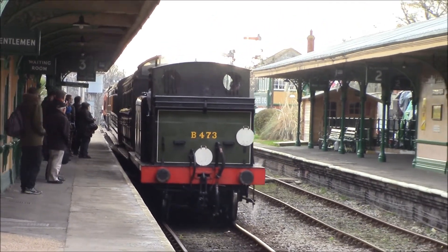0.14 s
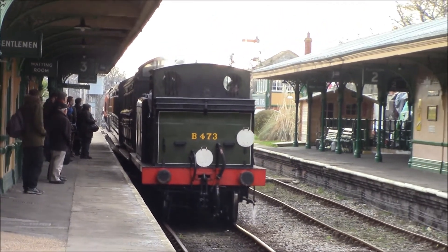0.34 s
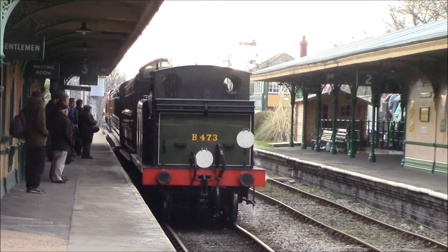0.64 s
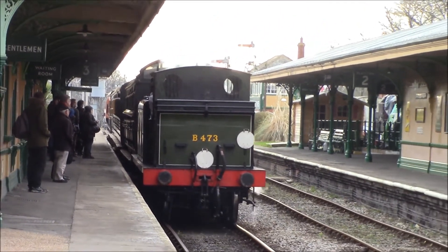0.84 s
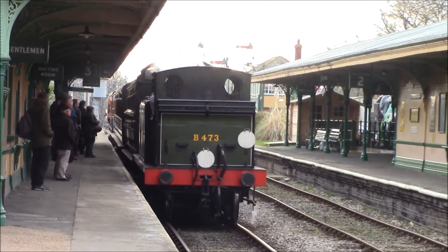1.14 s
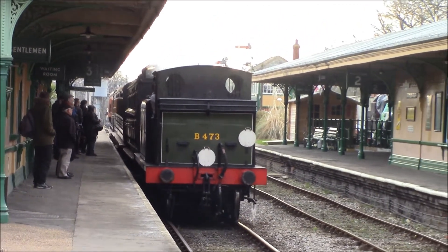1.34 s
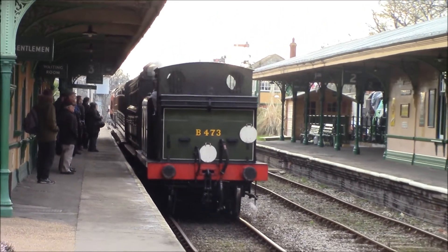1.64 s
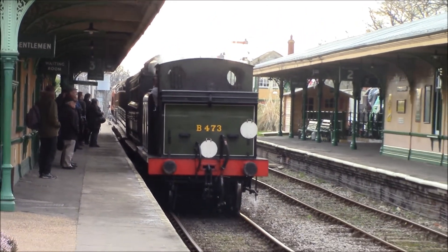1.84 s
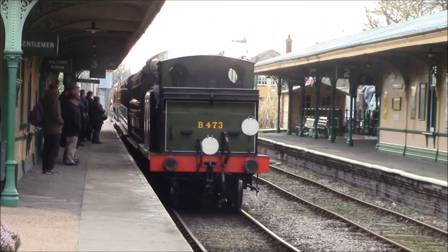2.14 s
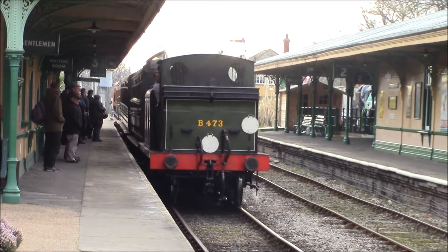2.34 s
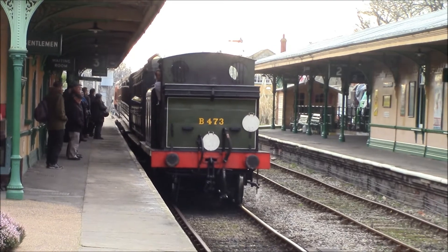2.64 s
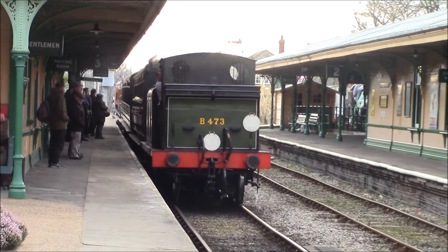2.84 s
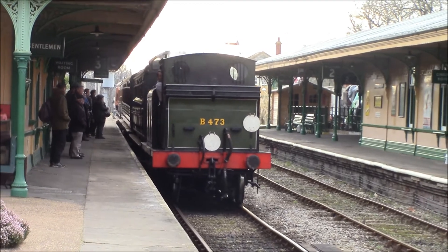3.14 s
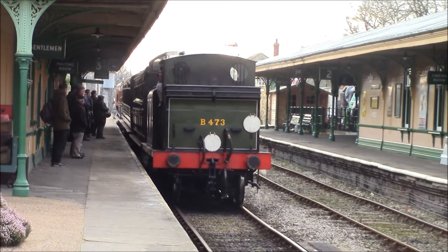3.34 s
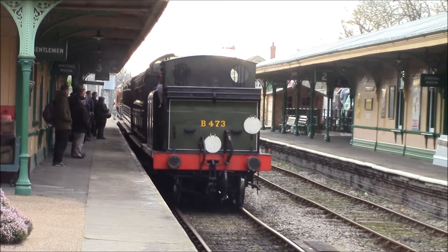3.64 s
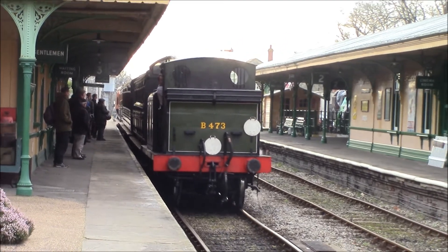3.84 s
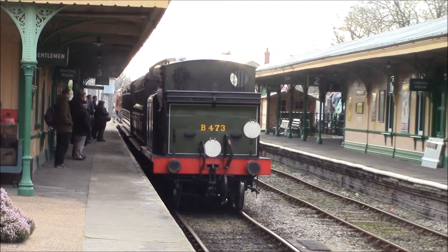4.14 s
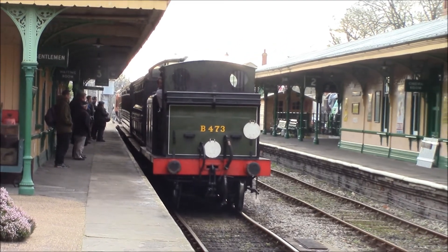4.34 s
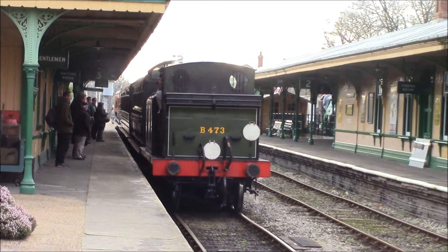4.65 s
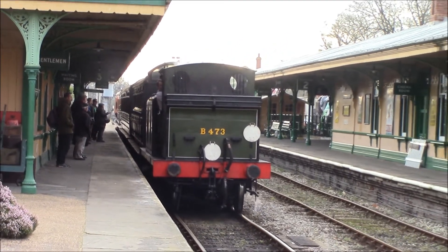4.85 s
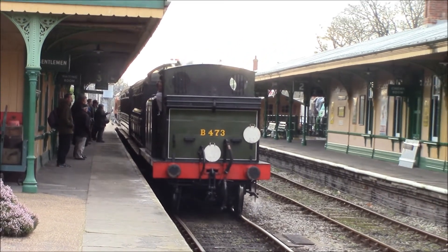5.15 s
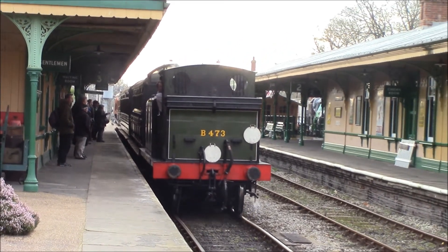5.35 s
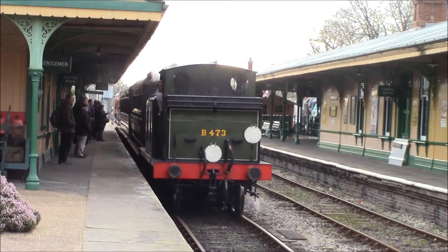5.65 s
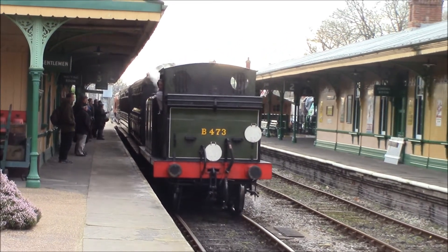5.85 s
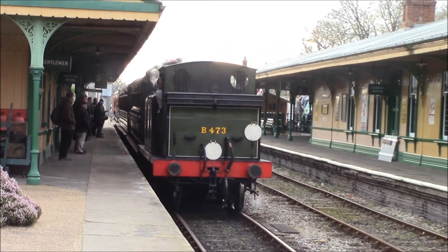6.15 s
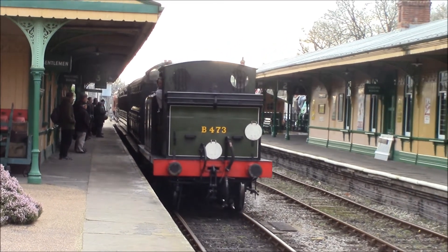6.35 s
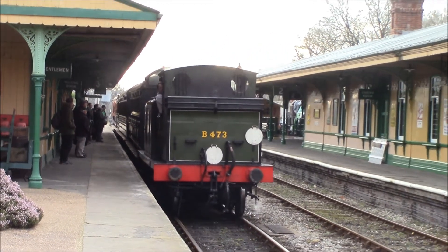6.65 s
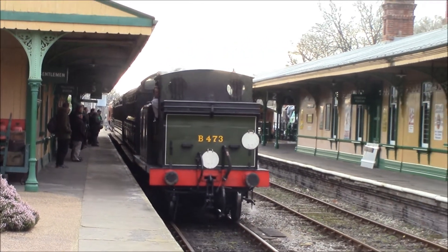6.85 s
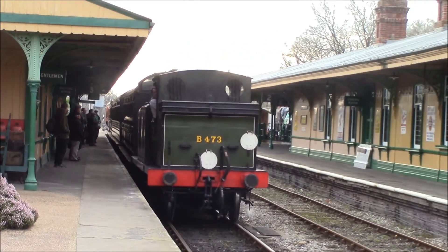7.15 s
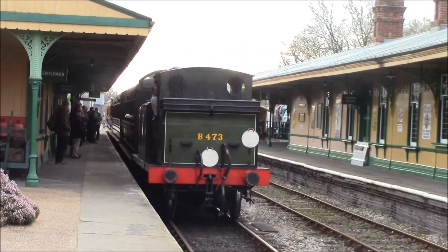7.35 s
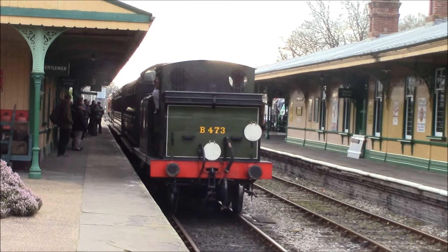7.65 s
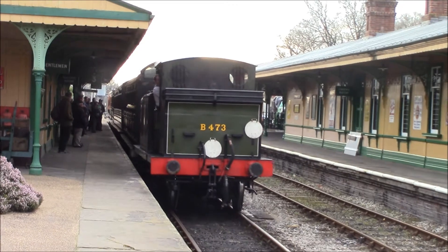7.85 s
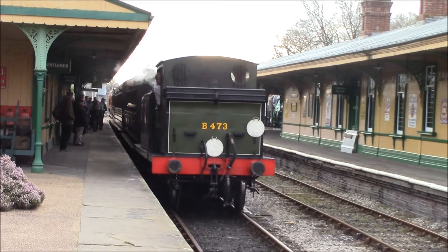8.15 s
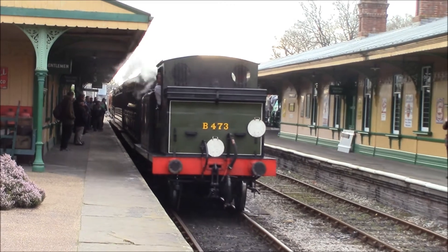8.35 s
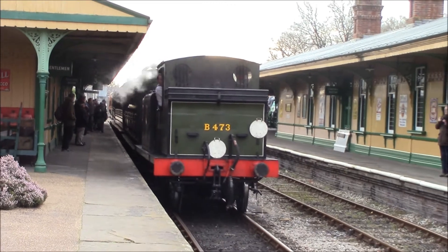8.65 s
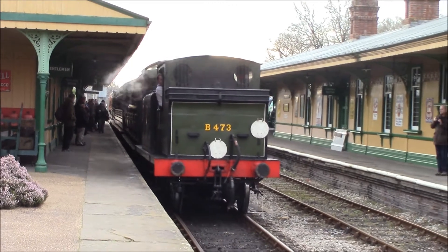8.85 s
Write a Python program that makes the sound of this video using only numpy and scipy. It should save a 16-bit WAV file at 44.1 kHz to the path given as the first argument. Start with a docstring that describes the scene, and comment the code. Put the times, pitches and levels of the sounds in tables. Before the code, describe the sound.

From the start, a loud hollow roar of steam rings through a pipe over bright hiss, swelling to about 0.3 s, then shutting off sharply; a breathy remnant and low drone die away by 0.85 s. A dull wind knock lands near 0.6 s. From 1 to 4 s a quieter, thin, steady hiss sizzles and sputters, with short bright spurts whose pitch often rises, a brief breathy whistle near 2.2 s and a firm low thump at 2.05 s. From 4.4 s the steam builds, peaking around 5.1 s and staying strong and rushing until 6.8 s, with wet spits. Faint wheel rumble rises near 6.75 s. Dull wind puffs crowd the microphone from 6.8 to 7.5 s as the hiss drops. Until 9 s it surges unevenly, with bright spurts, faint whistling and small knocks near 8.75 s. Open-air platform, close stereo perspective, slight dull reflections.

```python
"""Escaping steam hisses, spurts and swells as a tank engine rolls slowly in, heard from the platform edge:
coloured noise follows a jet curve, with narrow noise bands for the singing gap and pipe.
A hollow roar of steam through a ringing pipe shuts off early and dies away over a low drone.
Wheels rumble faintly as low noise; puffs of air knock dully on the microphone as short bursts of low
noise, thickest from about 6.8 to 7.5 s, and a few crosswind thumps differ a little on each side."""
import sys
import numpy as np
from scipy import signal
from scipy.fft import rfft, irfft, next_fast_len
from scipy.io import wavfile
from scipy.ndimage import uniform_filter1d

SR = 44100
rng = np.random.default_rng(int(sys.argv[2]) if len(sys.argv) > 2 else 0)


def int16_out(signal):
    """Quantize to a 16-bit WAV file."""
    q = np.round(np.clip(np.atleast_2d(signal).T, -1, 1) * 32767)
    wavfile.write(sys.argv[1], SR, q.astype(np.int16))


N = 397341

# Main jet, drives the hiss, sizzle and spray: (time [s], level [dB])
JET_DB = [(0, -25), (.13, -22.5), (.3, -21.5), (.365, -24), (.39, -28.5), (.95, -28.5), (1.15, -30),
          (1.7, -27.5), (2.05, -27), (2.09, -30.5), (2.14, -28), (2.5, -28), (2.57, -29), (2.8, -27.5),
          (3.68, -27), (3.76, -25), (3.85, -28.5), (3.99, -29), (4.06, -26), (4.32, -27), (4.43, -24),
          (4.77, -25), (4.93, -22), (5.04, -20.5), (5.12, -18.5), (5.27, -21), (5.4, -19.5), (5.54, -21.2),
          (5.85, -20), (6.08, -20), (6.25, -18), (6.32, -20), (6.49, -19), (6.68, -20.5), (6.81, -21.5),
          (6.88, -25), (7.2, -26), (7.3, -28.5), (7.44, -24.5), (7.64, -28), (7.74, -25.5), (7.83, -26),
          (7.91, -22.5), (8.18, -27), (8.34, -24.5), (8.66, -25.5), (8.83, -23.5), (9, -25.5)]
# Deep rush of the jet: (time [s], level [dB])
RUSH_DB = [(0, -38), (.5, -36), (1.1, -38), (4.85, -38), (4.97, -34), (6.2, -32), (6.75, -31.5), (7.1, -39),
           (7.7, -38), (9, -35)]
# Steam spectra: (frequency [Hz], relative level [dB])
RUSH_COLOUR = [(250, -22), (480, -17), (650, -9), (1000, -1.5), (1300, -.5), (1600, 1.5), (2100, -32),
               (3500, -42)]
HISS_COLOUR = [(900, -32), (1500, -9), (1800, -6), (2400, -2), (3050, 0), (3950, -2.1), (4250, -5),
               (4900, -7.5), (5600, -7.5), (6500, -9.5), (7500, -8.5), (12000, -29.5)]
SIZZLE_COLOUR = [(4000, -31), (5200, 4), (6500, -1.5), (7200, -1), (7700, 6.5), (8800, -1), (9500, 0),
                 (11000, -36), (15000, -42)]
SPRAY_COLOUR = [(7000, -26), (9800, 7), (11000, 3), (12300, 2.5), (12700, -5), (13300, -2), (14300, -8),
                (15600, -14)]
# Resonances rung by the steam: (frequency [Hz], width [Hz], lift [dB])
STEAM_MODES = [(574, 117, 8.5), (813, 55, 7), (1220, 200, 6), (1827, 94, 7), (2000, 220, 4), (2230, 99, 3),
               (2550, 104, 4.5), (2840, 170, 3), (3093, 99, 4), (3256, 82, 2), (3544, 95, 3),
               (3870, 176, 4), (4040, 70, 2), (4620, 90, 2), (5490, 300, 0.5), (7480, 430, -4),
               (8720, 480, 5.5)]
# Jet at rest, and layer levels there
REST_DB, SIZZLE_DB, SPRAY_DB = -26.5, -37.5, -46
# Layer gain per dB of jet
SIZZLE_FOLLOW_DB_PER_DB, SPRAY_FOLLOW_DB_PER_DB = 0.54, 0.79
# Spray grows steadily as the engine nears, pivoting about this time
SPRAY_DB_PER_S, SPRAY_PIVOT_S = 0.6, 2.4
# Bright spurts and some dull lapses from a narrow gap; pitch may climb, hold or sink:
# (start [s], length [s], sizzle lift [dB], spray lift [dB], pitch rise [Hz])
SPURTS = [(0, 0.24, 2.5, 0, 0), (1.08, 0.2, 2.5, 4.5, 0), (1.824, 0.24, 2.5, 1, 299),
          (2.118, 0.17, 7, 4, 650), (2.344, 0.17, 4.5, 2, 600), (2.57, .24, 2.5, 2, 0),
          (3.134, .13, 4, 4, 99), (3.44, 0.23, 1, 0, 0), (3.69, 0.1, 2.5, 1, 1), (3.871, 0.053, 5, 4, 1),
          (4.119, 0.35, -7, -0.5, 0), (4.478, 0.19, 5, 2.5, 800), (4.731, 0.26, 6.5, 0, 751),
          (5.093, .08, -8, 1, 300), (5.17, 0.19, -10, 0.5, 300.5), (5.43, 0.41, 4.5, 1.5, 150),
          (5.95, 0.12, 8.5, 4, 249.5), (6.22, 0.098, 9.5, 3, 301), (6.372, 0.09, 10, 8, 350),
          (6.563, 0.088, 4, 2, 253.5), (6.752, 0.08, 6, 1, 148.5), (6.897, 0.12, 5, 2.5, -2.5),
          (7.162, 0.094, 5, 0, -200), (7.877, 0.11, 5.5, 1, 450), (7.984, 0.052, 9, 4, 450),
          (8.58, 0.11, 3, 0, 149), (8.911, 0.092, 10.5, 4, 98)]
SPURT_EDGE_S, SPURT_GLIDE_S = 0.0553, 0.12  # opening or closing time; pitch glide time
SPURT_HISS_SHARE = 0.014  # share of the spray lift [dB] added to the hiss
# Gap pitch at rest; water in the gap makes it jump about
GAP_HZ, GAP_WAVER_HZ, GAP_WAVER_PER_S = 7506, 140.2, 45
# Lower tone of the same gap: (time [s], level [dB])
RING_DB = [(0, -46), (1.5, -50), (2.1, -45.5), (4, -47), (5.9, -44), (6.4, -39), (6.9, -40), (7.7, -48),
           (8, -39.5), (8.4, -47), (9, -44)]
RING_HZ, RING_HALF_WIDTH_HZ = 5490, 66
RING_LIFT_SHARE, RING_RISE_SHARE = 0.3, 0.55  # shares of sizzle lift [dB] and pitch rise [Hz]
# Half-whistling pipe: (time [s], level re jet [dB])
WHISTLE_DB = [(0, -21), (2, -22), (4.6, -18), (5.2, -9), (6.1, -13), (6.4, -13), (6.9, -15), (9, -6)]
# Its tones: (frequency [Hz], half-width [Hz], relative level [dB])
WHISTLE_MODES = [(1812, 20, -4), (2528, 20, 0), (3020, 50, -1), (3545, 35, -7), (3940, 70, -3)]
# Its clearest tone: (time [s], level re jet [dB])
LEAD_TONE_DB = [(1.9, -28), (2.17, -7), (2.4, -28), (4.2, -22), (4.5, -5), (4.85, -18), (5.35, -11),
                (5.8, -14), (6.3, -17), (7.2, -16), (7.45, -15), (7.75, -11.5), (7.93, -18), (8.08, -9),
                (8.38, -10), (8.6, -14), (8.85, -11), (9, -19)]
LEAD_HZ, LEAD_HALF_WIDTH_HZ = 2872, 26
# Wet spits, bell-shaped: (centre time [s], level [dB], standard deviation [s])
SPITS = [(.22, -31, .02), (.32, -29, .022), (3.57, -35, .02), (3.754, -38, 0.028), (4.49, -39, 0.027),
         (5.107, -26, 0.039), (6.253, -24, 0.035), (6.422, -39, .03), (6.79, -26.5, 0.054),
         (7.453, -28, .024), (7.95, -34, 0.05), (8.28, -35, .022), (8.43, -34, .025)]
# Spit spectrum: (frequency [Hz], relative level [dB])
SPIT_COLOUR = [(2000, -6), (3900, 9), (4600, -7), (5500, 7.5), (6500, -6), (8000, -5), (11000, -16),
               (15000, -20)]
# Default stereo width: (frequency [Hz], side minus mid [dB])
WIDTH = [(40, -24), (150, -49), (500, -48), (1200, -64), (2300, -59), (3000, -58), (3800, -15.5),
         (8000, -13.5), (13000, -10.5)]

# Spectra of the roar, of the steam lingering after it and of its drone:
# (frequency [Hz], relative level [dB])
ROAR_COLOUR = [(200, -18), (430, -8), (600, -2), (930, -3.5), (1300, -1), (1550, -2.5), (1900, -9),
               (2400, -14.5), (3500, -14), (5500, -57)]
LINGER_COLOUR = [(200, -11), (450, -6), (800, -2.5), (1150, -8), (1550, 0.5), (2100, -2), (3500, 1),
                 (5500, -50)]
DRONE_COLOUR = [(25, -28), (50, -19), (70, -8), (110, 4), (170, -2.5), (230, 0.5), (280, 3), (400, -6),
                (800, -60)]
# Pipe resonances, and those rung only by the full blast: (frequency [Hz], width [Hz], lift [dB])
PIPE_MODES = [(157, 5, 14), (176, 5, 11), (218, 18, 9), (267, 8, 10), (590, 12, 6), (629, 14, 6),
              (797, 14, 10), (1391, 20, 11), (1445, 20, 7), (1492, 15, 9)]
BLAST_MODES = [(1085, 25, 8), (1151, 12, 17), (1185, 26, 10), (2650, 200, 13), (3230, 300, 15),
               (3750, 300, 12)]
# Near-steady pipe tones: (frequency [Hz], level re strongest [dB])
DRONE_TONES = [(157, 0), (175, -1), (268, -6)]
# Roar fills the station: (frequency [Hz], side minus mid [dB])
ROAR_WIDTH = [(60, -16), (110, -33), (200, -36), (380, -20), (700, -32), (1290, -26), (2380, -13),
              (4400, -16), (8120, -20), (15000, -17)]
ROAR_PEAK_S, ROAR_SHUT_S, ROAR_SHUTTING_S, ROAR_END_S = 0.2, 0.31, 0.065, 0.82
ROAR_RELEASE_DB_PER_S = 104  # after ROAR_END_S

# Rolling wheels: (time [s], level [dB])
ROLL_DB = [(1, -51), (1.5, -54), (2.6, -51), (3.9, -56.5), (4.75, -61.5), (5.05, -51.5), (5.8, -49),
           (6.75, -39.5), (7.25, -51), (8.5, -57), (9, -50)]
# Rolling spectrum: (frequency [Hz], relative level [dB])
ROLL_COLOUR = [(20, -42), (35, -29), (50, -22), (80, -15.5), (150, -3), (230, -1.5), (310, 4.5), (420, -5),
               (700, -1.5), (1500, -26)]

# Single hard puffs on the microphone:
# (time [s], level before BUFFET_GAIN_DB [dB], length [s], centre [Hz])
BUFFETS = [(0.583, -21, 0.006, 206), (2.029, -27, 0.013, 312), (2.043, -18, 0.0065, 360),
           (2.068, -31, .003, 420), (2.469, -25.5, .0045, 302), (2.692, -36, 0.0065, 265),
           (2.734, -41, .008, 270), (2.85, -32, 0.012, 320), (3.153, -40, .006, 320),
           (3.395, -41, 0.012, 288), (4.083, -42, .008, 350), (6.137, -37, 0.013, 246),
           (6.388, -32, 0.01, 322.5), (6.559, -24, 0.0056, 271.2), (6.732, -23.5, 0.0054, 281),
           (6.785, -12.8, 0.008, 330), (6.804, -13, 0.0041, 340), (6.811, -13.5, 0.007, 280),
           (6.847, -22, 0.0036, 430), (6.855, -19, 0.006, 430), (6.864, -17, .006, 405),
           (6.895, -23, 0.011, 477), (6.911, -24.5, 0.0079, 424), (6.976, -33, .005, 480),
           (6.993, -19.5, 0.0036, 660), (7.011, -16.5, 0.0042, 477), (7.023, -22.5, 0.0053, 623),
           (7.033, -22, 0.006, 900), (7.118, -27, 0.0076, 381), (7.163, -36, .005, 270),
           (7.34, -29.5, 0.0062, 330), (7.367, -23, 0.0025, 598), (7.38, -25, .004, 520),
           (7.392, -16, .005, 540), (7.398, -20, .004, 520), (7.405, -18.5, 0.0042, 484),
           (7.431, -24, .006, 480), (7.445, -18.5, .004, 560), (7.455, -18.5, 0.006, 582),
           (7.468, -21, 0.0042, 484), (7.501, -31, 0.0056, 400), (7.52, -28, 0.007, 480),
           (7.658, -28, 0.0068, 313.4), (7.932, -37, 0.042, 291), (8.285, -32, 0.0064, 463),
           (8.523, -35, .0095, 286.7), (8.739, -25, 0.0078, 371), (8.757, -28, 0.0074, 330),
           (8.792, -26, 0.0044, 440), (8.809, -25.5, 0.0039, 420), (8.878, -33, 0.013, 345)]
# Gusts of weaker eddies:
# (start [s], length [s], eddy level before scatter, taper and BUFFET_GAIN_DB [dB], centre [Hz])
GUSTS = [(0.518, 0.058, -30, 278), (2.071, 0.036, -39, 260), (2.426, 0.027, -42, 260),
         (2.721, .06, -51, 265), (6.491, 0.084, -29.5, 240), (6.739, 0.12, -26.5, 279),
         (6.968, 0.075, -26, 474), (7.035, 0.052, -28.5, 350), (7.349, .15, -28, 420),
         (7.639, 0.056, -33.5, 279.5), (8.252, 0.075, -36.5, 302), (8.704, .12, -30, 340.3),
         (8.934, 0.069, -35.5, 350)]
BUFFET_GAIN_DB = 0.5
EDDY_GAP_S, EDDY_S, EDDY_SCATTER_DB, GUST_TAPER_DB = 0.013, 0.0076, 4.5, 9  # gap is the mean
SLAP_SHARE = 0.35  # share of power in the slap at the crest, ahead of the wake
# Wake: level re eddy, decay time, corner as a share of the eddy's centre frequency
WAKE_DB, WAKE_S, WAKE_REACH = -16, 0.017, 0.6164
# Crosswind bursts, bell-shaped: (centre time [s], level [dB], standard deviation [s])
CROSSWIND = [(.15, -34, .025), (.258, -26, 0.024), (.328, -31, .012), (.55, -42, .02), (6.805, -34, 0.014)]
# Crosswind spectrum: (frequency [Hz], relative level [dB])
CROSSWIND_COLOUR = [(50, -13), (110, -4), (180, -5), (300, -9), (450, -11), (900, -44)]
# Crosswind width: (frequency [Hz], side minus mid [dB])
CROSSWIND_WIDTH = [(60, -13), (130, -10), (400, -5)]

TOP_HZ = 15700


def steam():
    """A leaking jet: deep rush, ringing hiss, sizzle at the gap and a spray of droplets, all sputtering."""
    push_db = curve(JET_DB) - REST_DB
    sizzle_lift_db, spray_lift_db, rise_hz = spurting()

    rush = turbulence(RUSH_COLOUR, STEAM_MODES, (700, 1500)) * undb(curve(RUSH_DB))

    hiss = turbulence(HISS_COLOUR, STEAM_MODES, (1700, 4300))
    hiss = hiss * undb(curve(JET_DB) + SPURT_HISS_SHARE * spray_lift_db)
    hiss = hiss * flutter(slow_db=0.39, fast_db=0.5, slow_rate=28, fast_rate=180)

    sizzle_noise = turbulence(SIZZLE_COLOUR, STEAM_MODES, (7000, 9500))
    gap_hz = GAP_HZ + rise_hz + GAP_WAVER_HZ * walk(GAP_WAVER_PER_S)
    sizzle = undb(-2.5) * sizzle_noise + undb(-1.5) * singing_gap(gap_hz, half_width_hz=400)
    sizzle = sizzle * undb(SIZZLE_DB + SIZZLE_FOLLOW_DB_PER_DB * push_db + sizzle_lift_db)
    sizzle = sizzle * flutter(slow_db=0.6, fast_db=1.0, slow_rate=12, fast_rate=43)

    spray = turbulence(SPRAY_COLOUR, [], (10000, 15000))
    nearing_db = SPRAY_DB_PER_S * (np.arange(N) / SR - SPRAY_PIVOT_S)
    spray = spray * undb(SPRAY_DB + SPRAY_FOLLOW_DB_PER_DB * push_db + spray_lift_db + nearing_db)
    spray = spray * undb(walk(12))

    treble = (sizzle + spray) * flutter(slow_db=0.88, fast_db=0.97, slow_rate=36, fast_rate=230)
    jet = (rush + hiss + treble) * flutter(slow_db=0.14, fast_db=0.29, slow_rate=25, fast_rate=62)

    ring = singing_gap(RING_HZ + RING_RISE_SHARE * rise_hz + 35 * walk(20), RING_HALF_WIDTH_HZ)
    ring = ring * undb(curve(RING_DB) + RING_LIFT_SHARE * sizzle_lift_db + 2.0 * walk(16))
    return echoes(jet) + ring + whistle()


def spurting():
    """Spurts and lapses fade in and out, pitch gliding: sizzle lift [dB], spray lift [dB], pitch rise [Hz]."""
    out = np.zeros((3, N))
    for start_s, length_s, sizzle_db, spray_db, rise_hz in SPURTS:
        opens_s = start_s - SPURT_EDGE_S / 2
        gate = ramp(opens_s, SPURT_EDGE_S) - ramp(opens_s + length_s, SPURT_EDGE_S)
        out[0] += sizzle_db * gate
        out[1] += spray_db * gate
        out[2] += rise_hz * gate * ramp(start_s, SPURT_GLIDE_S)
    return out


def singing_gap(centre_hz, half_width_hz):
    """A gap sings a narrow band: low-passed noise pairs modulate a carrier of gliding pitch; rms 1."""
    lowpass = signal.butter(2, half_width_hz, fs=SR, output="sos")
    slow = signal.sosfilt(lowpass, rng.standard_normal((2, N)))
    phase = 2 * np.pi * np.cumsum(centre_hz) / SR
    band = slow[0] * np.cos(phase) + slow[1] * np.sin(phase)
    return band / band.std()


def whistle(waver_db=3.0, waver_per_s=11):
    """Narrow, breathy tones where the jet rings its pipe; each comes and goes on its own."""
    size = next_fast_len(N)
    hz = np.arange(size // 2 + 1) * SR / size
    tones = 0
    for centre_hz, half_width_hz, db in WHISTLE_MODES:
        resonance = 1 / (1 + ((hz - centre_hz) / half_width_hz) ** 2)
        tone = irfft(rfft(rng.standard_normal(size)) * resonance, size)[:N]
        tones = tones + tone * undb(db + waver_db * walk(waver_per_s))
    tones = tones / tones.std() * undb(curve(WHISTLE_DB))
    lead = singing_gap(LEAD_HZ + 14 * walk(9), LEAD_HALF_WIDTH_HZ) * undb(curve(LEAD_TONE_DB))
    return (tones + lead) * undb(curve(JET_DB))


def echoes(x, count=9, echo_db=-18, spread_s=0.024, drift=0.000225, dull_hz=5000):
    """Platform, canopy and boiler side return faint, dull copies; delays creep as the engine moves."""
    n = np.arange(N)
    dull = signal.sosfilt(signal.butter(1, dull_hz, fs=SR, output="sos"), x)
    out = x.copy()
    for late, creep in rng.uniform(0, 1, (count, 2)):
        delay_samples = (0.1 + late) * spread_s * SR + (2 * creep - 1) * drift * n
        out += undb(echo_db) * np.array([np.interp(n - delay_samples, n, ear, left=0) for ear in dull])
    # hold the power of the sum
    return out / np.sqrt(1 + count * undb(echo_db) ** 2)


def spits():
    """Water carried into the jet makes it spit brightly for a moment."""
    noise = turbulence(SPIT_COLOUR, [], (3000, 15000))
    return noise * swells(SPITS) * flutter(slow_db=2.0, fast_db=1.5, slow_rate=88, fast_rate=380)


def roar():
    """Steam blown hard through a pipe rings it; once shut off, a quieter, breathier hiss and a drone die away."""
    blast = turbulence(ROAR_COLOUR, PIPE_MODES + BLAST_MODES, (550, 1600), ROAR_WIDTH)
    after = turbulence(LINGER_COLOUR, PIPE_MODES, (550, 1600), ROAR_WIDTH)
    drone = turbulence(DRONE_COLOUR, PIPE_MODES, (60, 330), ROAR_WIDTH)
    sound = (blast * roar_level(peak_db=-20.5, swell_db=4.5, shut_db=5, linger_db=20)
             + after * roar_level(peak_db=-32.0, swell_db=9, shut_db=-0.4, linger_db=3.5)
             + drone * roar_level(peak_db=-27, swell_db=5, shut_db=8.5, linger_db=3.0)
             + drone_tones() * roar_level(peak_db=-29.5, swell_db=2.5, shut_db=15, linger_db=12))
    return sound * flutter(slow_db=1.0, fast_db=0.7, slow_rate=40.7, fast_rate=100)


def roar_level(peak_db, swell_db, shut_db, linger_db):
    """Gain: swells to its peak, steps as the steam shuts off, fades slowly, then releases fast."""
    swell = swell_db * (1 - ramp(0, ROAR_PEAK_S))
    shut = shut_db * ramp(ROAR_SHUT_S, ROAR_SHUTTING_S)
    linger = linger_db * ramp(ROAR_SHUT_S, ROAR_END_S - ROAR_SHUT_S)
    release = ROAR_RELEASE_DB_PER_S * np.maximum(np.arange(N) / SR - ROAR_END_S, 0)
    return undb(peak_db - swell - shut - linger - release)


def drone_tones(waver_hz=1.9, waver_db=2.0):
    """The blast holds low pipe resonances as sines of nearly steady pitch."""
    out = np.zeros(N)
    for tone_hz, db in DRONE_TONES:
        gain = np.sqrt(2) * undb(db + waver_db * walk(12))
        phase = 2 * np.pi * np.cumsum(tone_hz + waver_hz * walk(10)) / SR
        out += gain * np.sin(phase)
    return out


def wheels():
    """Slow wheels on the rails give an uneven, faint rumble of low noise."""
    rumble = turbulence(ROLL_COLOUR, [], (90, 450))
    return rumble * undb(curve(ROLL_DB)) * flutter(slow_db=2.5, fast_db=2.0, slow_rate=12, fast_rate=39)


def buffets(spread=0.62, skirt=2.45, edge=0.85, low_edge=0.62, side_db=-49.0, side_hz=300):
    """Each eddy: a swell of low pressure noise, a slap at its crest, a rough wake; pitch sets its reach."""
    size = 8192
    t = (np.arange(size) - size // 2) / SR
    hz = np.arange(size // 2 + 1) * SR / size
    to_crest = np.exp(-2j * np.pi * hz * (size // 2) / SR)
    # the two ports differ a little, most at low frequency
    width = undb(side_db) / np.sqrt(1 + (hz / side_hz) ** 2)
    out = np.zeros((2, N + 2 * size))
    for time_s, db, length_s, centre_hz in BUFFETS + eddies():
        swell = np.exp(-0.5 * (t / (spread * length_s)) ** 2)
        bass_cut = hz ** 4 / (hz ** 4 + (low_edge * centre_hz) ** 4)
        tone = bass_cut / np.sqrt(1 + (hz / (edge * centre_hz)) ** (2 * skirt))
        noise = rfft(rng.standard_normal((2, size)) * swell)
        churn, side = irfft(noise * np.array([tone, tone * width]))
        slap = irfft(tone * to_crest * np.exp(2j * np.pi * rng.random()))
        slap = slap * churn.std() / slap.std()
        mid = np.sqrt(1 - SLAP_SHARE) * churn + np.sqrt(SLAP_SHARE) * slap

        trail = np.exp(-np.abs(t - length_s) / np.where(t > length_s, WAKE_S, length_s))
        wake_tone = hz ** 2 / (1 + (hz / (WAKE_REACH * centre_hz)) ** 2) ** 2
        wake = irfft(rfft(rng.standard_normal(size) * trail) * wake_tone)
        mid = mid + undb(WAKE_DB) * wake * mid.std() / wake.std()

        # level is the rms over length_s
        strength = undb(db + BUFFET_GAIN_DB) * np.sqrt(length_s * SR / np.sum(mid ** 2))
        start = int(time_s * SR) + size // 2
        out[:, start:start + size] += strength * np.array([mid + side, mid - side])
    return out[:, size:size + N]


def eddies():
    """A gust breaks into unevenly spaced eddies, tending strongest mid-gust: rows like BUFFETS."""
    rows = []
    for start_s, length_s, db, centre_hz in GUSTS:
        count = max(round(length_s / EDDY_GAP_S), 1)
        for k, (shift, strength) in enumerate(rng.uniform(-1, 1, (count, 2))):
            place = (k + 0.5 + 0.296 * shift) / count
            eddy_db = db + EDDY_SCATTER_DB * strength - GUST_TAPER_DB * (2 * place - 1) ** 2
            rows.append((min(start_s + place * length_s, N / SR), eddy_db, EDDY_S, centre_hz))
    return rows


def crosswind():
    """Wind thumps both ports with mostly shared low noise, a little different on each side."""
    thump = turbulence(CROSSWIND_COLOUR, [], (60, 400), CROSSWIND_WIDTH)
    return thump * swells(CROSSWIND)


def turbulence(points, modes, band_hz, width_points=WIDTH):
    """Turbulent flow as coloured stereo noise, lifted by resonances; mid rms near 1 inside the band."""
    size = next_fast_len(N)
    hz = np.arange(size // 2 + 1) * SR / size
    power = np.ones_like(hz)
    for centre_hz, width_hz, db in modes:
        power += (undb(db) ** 2 - 1) / (1 + (2 * (hz - centre_hz) / width_hz) ** 2)
    gain = colour(hz, points) * np.sqrt(np.abs(power))
    in_band = (hz > band_hz[0]) * (hz < band_hz[1])
    gain = gain / np.sqrt(np.mean(gain ** 2 * in_band))
    # keep falling below the lowest point
    gain = gain * np.minimum(hz / points[0][0], 1) ** 2
    mid, side = rfft(rng.standard_normal((2, size))) * gain
    side = side * colour(hz, width_points)
    return irfft(np.array([mid + side, mid - side]), size)[:, :N]


def flutter(slow_db, fast_db, slow_rate, fast_rate):
    """Unsteady flow surges and sputters: gain from a slow and a fast random walk, rates per s."""
    return undb(slow_db * walk(slow_rate) + fast_db * walk(fast_rate))


def walk(rate):
    """Random levels held 1 / rate s, smoothed twice; standard deviation 1."""
    k = max(int(SR / rate), 2)
    held = np.repeat(rng.standard_normal(N // k + 2), k)
    slewed = uniform_filter1d(uniform_filter1d(held, k), k)[:N]
    return slewed / slewed.std()


def swells(rows):
    """Sum of bell-shaped gains: (centre time [s], level [dB], standard deviation [s])."""
    t = np.arange(N) / SR
    return sum(undb(db) * np.exp(-0.5 * ((t - time_s) / sd_s) ** 2) for time_s, db, sd_s in rows)


def ramp(start_s, length_s):
    """Linear rise from 0 to 1."""
    return np.clip((np.arange(N) / SR - start_s) / length_s, 0, 1)


def curve(rows):
    """Linear interpolation over time: (time [s], value)."""
    rows = np.asarray(rows)
    return np.interp(np.arange(N) / SR, rows[:, 0], rows[:, 1])


def colour(hz, points):
    """Spectral gain, dB interpolated over log frequency."""
    points = np.asarray(points)
    return undb(np.interp(np.log(hz + 1), np.log(points[:, 0]), points[:, 1]))


def undb(db):
    """Decibels to amplitude gain."""
    return 10 ** (np.asarray(db) / 20)


def scene():
    """Engine and breeze together."""
    return steam() + spits() + roar() + wheels() + buffets() + crosswind()


def record(dry):
    """The recorder cuts the deepest bass (40 Hz high-pass) and the top (steep low-pass)."""
    dry = signal.sosfilt(signal.butter(2, 40, "high", fs=SR, output="sos"), dry)
    return signal.sosfilt(signal.ellip(10, 0.2, 80, TOP_HZ, fs=SR, output="sos"), dry)


dry = scene()
out = record(dry)
int16_out(out)
```